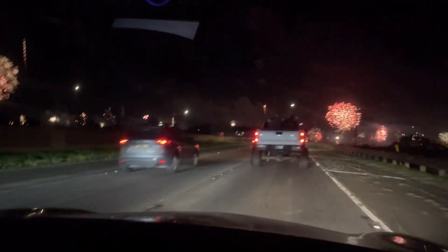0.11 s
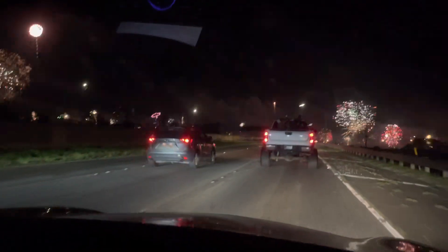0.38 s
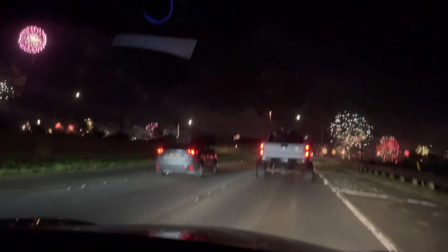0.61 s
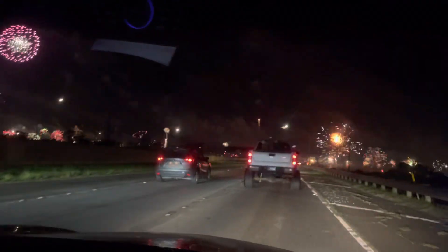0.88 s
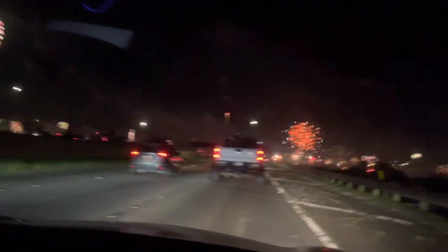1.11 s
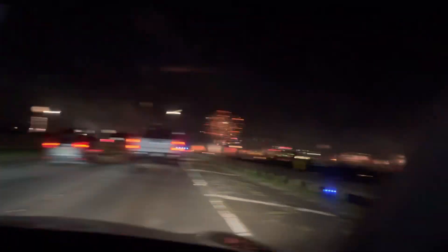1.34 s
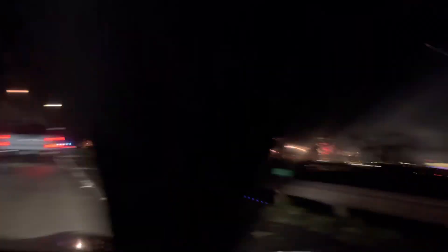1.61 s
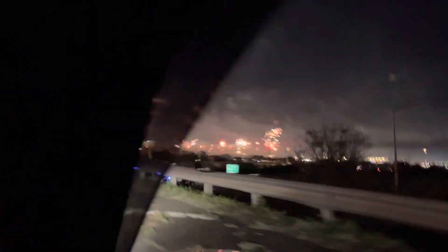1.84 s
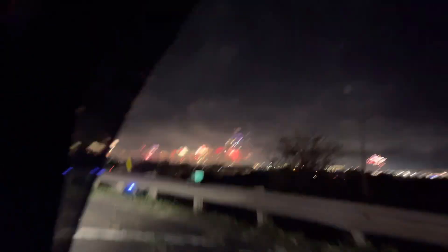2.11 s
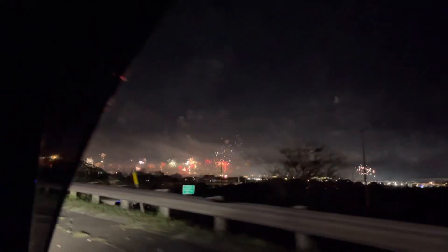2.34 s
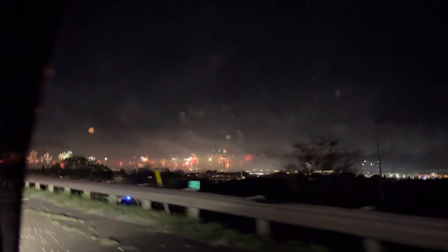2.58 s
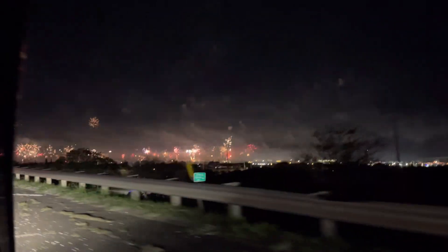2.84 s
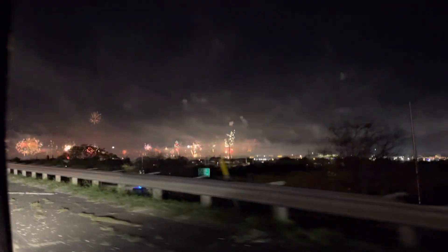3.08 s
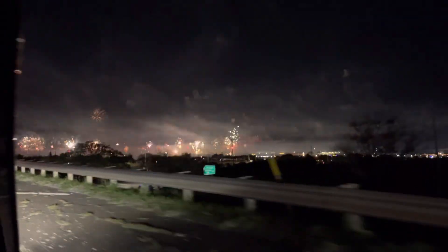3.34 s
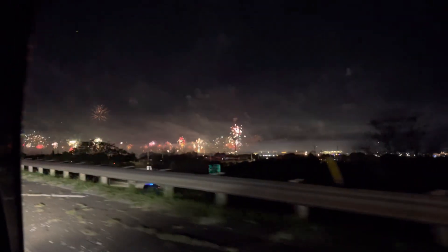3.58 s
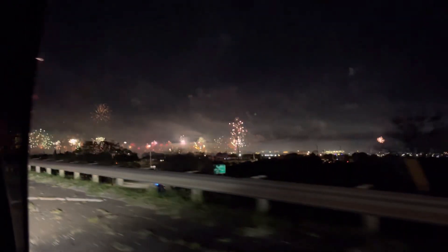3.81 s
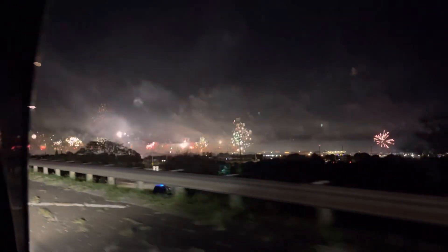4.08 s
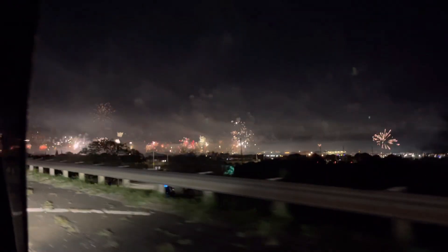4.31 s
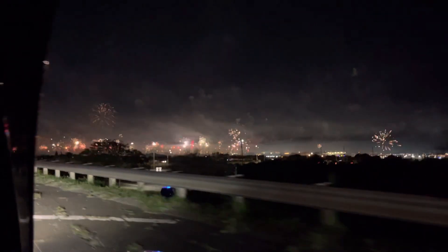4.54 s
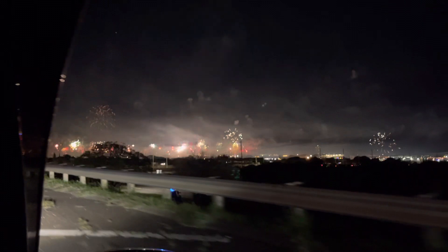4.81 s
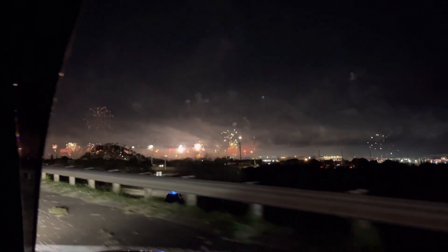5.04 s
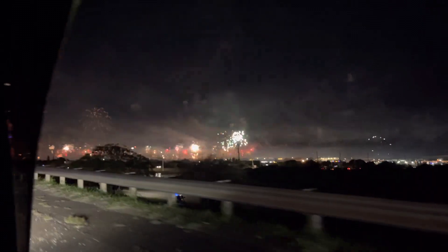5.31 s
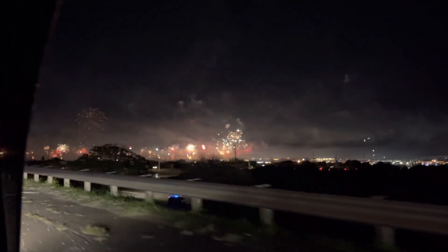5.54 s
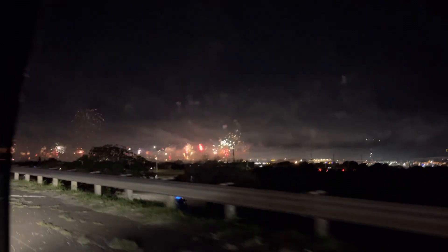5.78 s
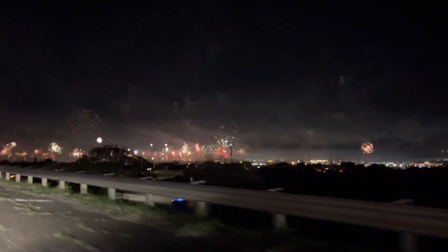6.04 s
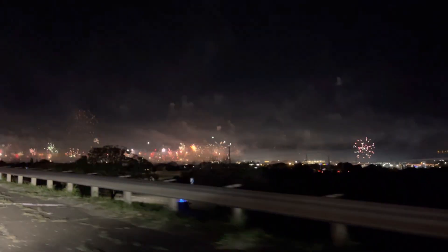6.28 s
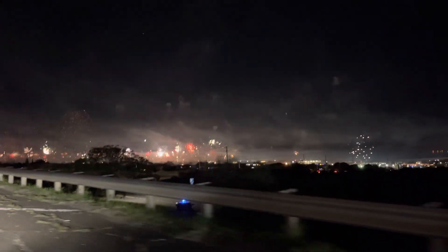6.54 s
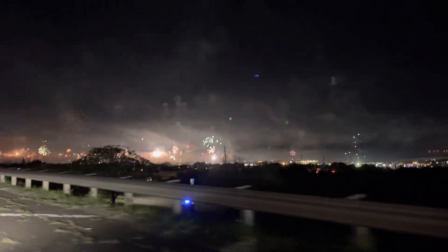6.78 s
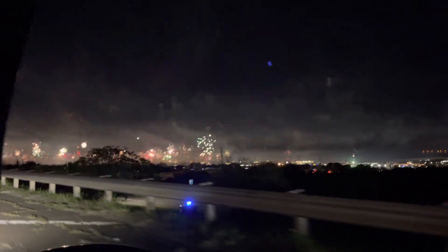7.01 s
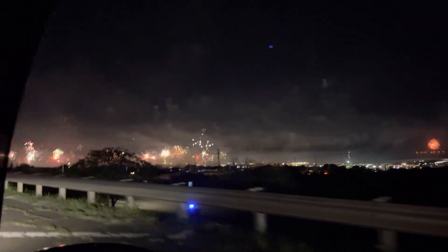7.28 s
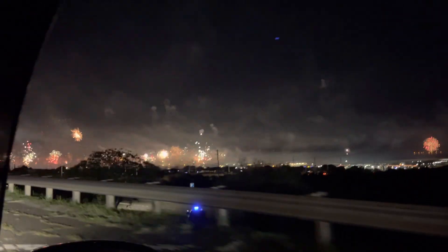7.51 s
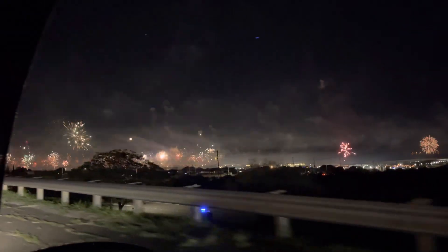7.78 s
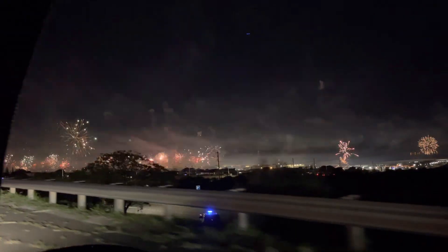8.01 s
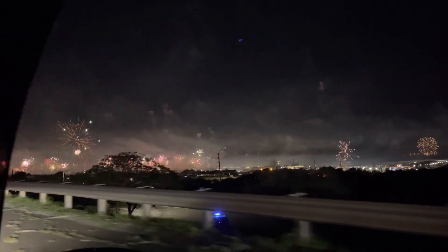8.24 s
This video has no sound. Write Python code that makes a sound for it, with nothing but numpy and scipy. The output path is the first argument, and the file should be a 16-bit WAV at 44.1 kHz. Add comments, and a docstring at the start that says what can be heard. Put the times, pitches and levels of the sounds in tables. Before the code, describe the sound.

Inside a moving car at night, low road boom gives way to dense, overlapping firework bangs and nonstop firecracker crackle from across a town.

```python
"""The low boom of a rolling car comes first; a moment later fireworks and firecrackers bang over a town at night.
A side window is open. Near bangs are blast pulses with echoes; far ones merge into a dull crackle.
Swarms of tiny pops make the sizzling stars; filtered noise makes the road, cabin boom, air rush and hiss.
The phone's crossover filters smear each pulse into a falling chirp, and a limiter holds the peaks."""
import sys
import numpy as np
from scipy import signal
from scipy.io import wavfile
from scipy.ndimage import uniform_filter1d, minimum_filter1d

SR = 44100
rng = np.random.default_rng(int(sys.argv[2]) if len(sys.argv) > 2 else 0)


def ratio_of_db(decibels):
    """Turn decibels (scalar or array-like) into linear amplitude factors; 0 dB maps to 1."""
    return 10 ** (np.asarray(decibels, float) / 20)


def dump(signal):
    """Clip the signal to [-1, 1] and save it as 16-bit WAV at the path in sys.argv[1]."""
    limited = np.clip(np.atleast_2d(signal).T, -1, 1)
    pcm = np.round(limited * 32767).astype(np.int16)
    wavfile.write(sys.argv[1], SR, pcm)


N = 369558


def rms_one(x):
    """Scale to unit rms."""
    return x / np.sqrt(np.mean(x ** 2) + 1e-20)


def in_time(rows):
    """Draw straight lines between the rows of a time table: one curve per column."""
    s, *columns = np.transpose(rows)
    return [np.interp(np.arange(N) / SR, s, column) for column in columns]


def at_hz(points, hz):
    """Read a spectrum at one frequency, on a log axis."""
    point_hz, value = np.array(points).T
    return np.interp(np.log(hz), np.log(point_hz), value)


def cut(x, hz, kind, order=2):
    """Butterworth filter: keeps the low, the high or a band of frequencies."""
    return signal.sosfilt(signal.butter(order, hz, kind, fs=SR, output="sos"), x)


def resonance(x, hz, width_hz):
    """A two-pole ringing band with gain 1 at its peak."""
    r = np.exp(-np.pi * width_hz / SR)
    poles = [1, -2 * r * np.cos(2 * np.pi * hz / SR), r * r]
    return signal.lfilter([(1 - r * r) / 2, 0, (r * r - 1) / 2], poles, x)


def drift(rate_hz):
    """Slow random wandering with spread 1, from smoothed noise."""
    step = 40   # samples between the points of the slow curve
    r = np.exp(-2 * np.pi * step * rate_hz / SR)
    noise = rng.standard_normal(N // step + 2002)
    slow = signal.lfilter([1], [1, -2 * r, r * r], noise)[2000:]   # skip the run-in
    return np.interp(np.arange(N) / step, np.arange(len(slow)), rms_one(slow))


def blast(push_ms, rise_ms):
    """A jump in pressure that falls through zero into suction; distance rounds the front."""
    age = np.arange(2000) / SR / (max(push_ms, .05) / 1000)
    r = np.exp(-1000 / SR / max(rise_ms, .01))
    pulse = signal.lfilter([1], np.poly([r, r, r]), (1 - age) * np.exp(-age))
    return pulse / pulse.max()


def at_ports(x, pan_db, lag_ms):
    """The middle range is shadowed on the far side, and the right port hears the whole pulse a little late."""
    middle = cut(x, [560, 4300], "band")
    left, right = x - middle + middle * ratio_of_db([[pan_db / 2], [-pan_db / 2]])
    n = np.arange(len(x))
    late_right = np.interp(n - lag_ms * SR / 1000, n, right, left=0)
    return np.array([left, late_right])


BOUNCE_MS, BOUNCE_SHARE = 1.2, 0.56   # longest delay and greatest strength of the bounces off road and barrier


def with_echoes(pulse, near_db, far_db, far_t60):
    """Two hard bounces colour a pulse; a tight cluster off ground and car body and a scattered tail follow."""
    age = np.arange(6000) / SR
    sparse = rng.random((3, len(age))) < .06
    # first the random draws, then thinned to single returns
    shared, left, right = rng.standard_normal((3, len(age))) * sparse
    decay = ratio_of_db(near_db - 60 * age / 0.016) + ratio_of_db(far_db - 60 * age / far_t60)
    returns = shared + 0.69 * np.array([left, right])
    path = cut(returns * decay, 3100, "low", order=1)
    path[:, 0] += 1   # the direct sound
    delays = 1 + (rng.random(2) * BOUNCE_MS * SR / 1000).astype(int)
    path[:, delays] += BOUNCE_SHARE * rng.random() * np.array([1, -1])
    return signal.fftconvolve(pulse, path, axes=1)[:, :len(age)]


BANG_LEFT_DB, BANG_SCATTER_DB = 7, 0.5   # bangs lie mostly to the left, scattered about that side
THUMP_PUSH_MS, THUMP_RISE_MS = 0.59, 0.35
# near bangs: (t/s, level/dB, push/ms grows with charge size, rise/ms grows with distance)
NEAR_BANGS = [(0.102, -7, 12, 0.033), (0.155, -5, 13, 0.3), (.534, -8, 1.1, 0.79), (0.558, -4, 1.4, 0.13),
              (0.6868, -1, 1.3, 0.082), (0.8172, -8.5, 0.71, 0.06), (1.064, -7.5, 0.3, 0.072),
              (1.066, -2, 3.5, 0.4), (1.141, -4.5, 1.2, 0.32), (1.323, 0.5, 4.4, 0.022),
              (1.4566, -3.5, 0.99, 0.43), (1.574, -2, 5, 0.051), (1.584, 2, 1.3, 0.6),
              (1.612, -4, 0.19, 0.082), (1.6757, -1, 0.66, 0.42), (1.7551, -5.5, 0.21, 0.036),
              (1.899, -5, 0.16, 0.088), (1.9789, 0.5, 2.3, 0.053), (1.996, 0, 0.12, 0.76),
              (2.037, -1, 0.68, 0.078), (2.304, -8, 0.46, 0.37), (2.322, 3.5, 2, 0.052),
              (2.377, 7, 1.05, 0.14), (2.464, -4.5, 0.91, 0.11), (2.502, -3, 3.9, 0.071),
              (2.531, -4, 0.17, 0.18), (2.7604, -1.5, 0.87, 0.058), (2.8043, 3, 0.38, 0.031),
              (2.8895, -9.5, 0.24, 0.051), (2.9141, -8.5, 0.29, 0.039), (3.039, 2, 2.5, 0.05),
              (3.101, 0, 1.6, 0.26), (3.181, -0.5, 0.9, 0.13), (3.24, -8, 0.56, 0.064),
              (3.426, -0.5, 0.52, 0.38), (3.448, -2, 0.48, 0.14), (3.61, 2.5, 2.1, 0.023),
              (3.7022, -1, 0.7, 0.044), (3.7806, -1.5, 0.88, 0.077), (3.857, -11.5, 0.26, 0.024),
              (3.8621, -1.5, 2.6, 0.062), (3.9379, -1, 1.7, 0.19), (4.1006, 0.5, 0.94, 0.065),
              (4.1198, 2, 2.5, 0.095), (4.2051, -1.5, 0.97, 0.058), (4.525, 4, 0.63, 0.029),
              (4.5951, 1.5, 2.9, 0.066), (4.626, -4, 0.34, 0.23), (4.644, -2.5, 0.82, 0.034),
              (4.6702, -3, 2.2, 0.15), (4.8898, -3, 0.26, 0.12), (4.9841, -3.5, 0.47, 0.11),
              (5.0872, -3, 0.52, 0.068), (5.1874, 1, 1.1, 0.07), (5.2, 1, 4.3, 0.42),
              (5.2376, -6, 0.58, 0.19), (5.332, -3.5, 0.72, 0.24), (5.4454, -7, 1, 0.034),
              (5.453, -2.5, 0.55, 0.76), (5.673, -1.5, 0.97, 0.092), (5.7047, 1, 4.3, 0.15),
              (5.73, -0.5, 1.2, 0.032), (5.818, 6, 1.36, 0.051), (5.879, 2, 0.57, 0.0097),
              (5.8979, 1.5, 1.4, 0.17), (5.9266, -1.5, 0.23, 0.029), (5.9709, 7, 0.45, 0.13),
              (6.079, -1, 1.1, 0.32), (6.0898, 12, 0.91, 0.028), (6.119, 2, 0.25, 0.034),
              (6.2061, 3.5, 0.8, 0.15), (6.3024, -3, 0.67, 0.073), (6.322, -3, 1, 0.48),
              (6.332, -4.5, 0.73, 0.1), (6.4701, -5, 0.94, 0.074), (6.504, 8, 0.64, 0.064),
              (6.708, 4, 0.21, 0.035), (6.7485, -7.5, 0.72, 0.032), (6.7637, -2.5, 0.85, 0.11),
              (7.049, -1, 1.1, 0.1), (7.115, 0, 1.3, 0.12), (7.2082, -2, 0.087, 0.07),
              (7.2698, -4.5, 0.42, 0.22), (7.3278, 0, 0.57, 0.056), (7.6012, 6.5, 1.8, 0.099),
              (7.629, -3.5, 0.8, 0.037), (7.752, 0, 0.85, 0.48), (7.841, -1.5, 0.8, 0.32),
              (8, -4, 0.69, 0.093), (8.308, -5, 0.56, 0.041)]
# far shells, heard as dull thumps of one size: (t/s, level/dB)
FAR_THUMPS = [(1.197, -8.5), (1.311, -2.5), (1.9641, -2), (2.225, -8), (2.025, -2), (2.056, 2),
              (2.095, -6.5), (2.208, -11), (2.2552, -13), (2.6335, -7), (2.829, -14), (3.021, -3),
              (3.075, -5.5), (3.677, -9), (3.747, -3.5), (3.893, -1), (4.282, -6), (4.33, -11), (6.525, -4),
              (6.567, -6), (6.631, -17), (6.695, -2), (6.827, -3.5), (6.906, -13), (7.298, -9),
              (7.581, -10.5), (7.885, -11), (7.967, -4.5)]


def near_bangs():
    """Each bang or thump is one blast pulse; the more it lies to the left, the later the right port hears it."""
    out = np.zeros((2, N + 6000))
    rows = NEAR_BANGS + [(s, db, THUMP_PUSH_MS, THUMP_RISE_MS) for s, db in FAR_THUMPS]
    sides_db = BANG_LEFT_DB + BANG_SCATTER_DB * rng.standard_normal(len(rows))
    for (s, level_db, push_ms, rise_ms), pan_db in zip(rows, sides_db):
        pulse = at_ports(blast(push_ms, rise_ms), pan_db, lag_ms=.012 * pan_db)
        heard = with_echoes(pulse, near_db=-15.5, far_db=-20.0, far_t60=0.079)
        at = round(s * SR)
        out[:, at:at + heard.shape[1]] += ratio_of_db(level_db) * heard
    return out[:, :N]


CRACKER_PUSH_MS, CRACKER_RISE_MS = 0.14, 0.065
# near firecrackers: (t/s, level/dB at 1.5-5 kHz)
NEAR_CRACKERS = [(2.6797, -24), (2.7365, -23), (2.917, -22), (3.069, -20), (3.2078, -18.5), (3.266, -31),
                 (3.325, -21.5), (3.66, -23), (3.913, -22), (4.021, -20.5), (4.1383, -18), (4.4998, -18),
                 (4.7516, -21), (5.1056, -30), (5.3677, -15.5), (5.4717, -28), (5.4909, -12.5),
                 (5.641, -23), (5.7852, -16), (5.9595, -23), (6.1826, -21), (6.786, -16.5), (7.2422, -21),
                 (7.3759, -16), (7.7132, -18), (7.921, -19.5)]


def near_crackers():
    """Firecrackers of one size close by, each a short sharp blast with its own returns."""
    out = np.zeros((2, N + 6000))
    sides_db = BANG_LEFT_DB + BANG_SCATTER_DB * rng.standard_normal(len(NEAR_CRACKERS))
    shape = blast(CRACKER_PUSH_MS, CRACKER_RISE_MS)
    shape = shape / np.abs(cut(shape, [1500, 5000], "band")).max()
    for (s, level_db), pan_db in zip(NEAR_CRACKERS, sides_db):
        pulse = at_ports(shape, pan_db, lag_ms=0.006 * pan_db)
        heard = with_echoes(pulse, near_db=-23.5, far_db=-9.5, far_t60=0.075)
        at = round(s * SR)
        out[:, at:at + heard.shape[1]] += ratio_of_db(level_db) * heard
    return out[:, :N]


# microphone port resonances: (f/Hz, width/Hz, level/dB)
PORT_RINGS = [(8710, 2350, 0), (11200, 1100, 0)]


def ports(x):
    """The microphone ports ring at the top of the range."""
    return sum(ratio_of_db(db) * resonance(x + 1e-18, hz, width) for hz, width, db in PORT_RINGS)


SPRAY_T60_S, SNAP_RISE_S = 0.086, 0.00042
# bright snaps: (t/s, relative treble level/dB, relative middle level/dB on top of the treble's)
BRIGHT_SNAPS = [(0.7068, -41.5, 20), (1.054, -27, -15), (1.068, -31.5, 17), (1.082, -32.5, 12.5),
                (1.1392, -30, -16), (1.3, -33.5, -11), (1.312, -44, 24), (1.3203, -21, 2), (1.458, -33, 21),
                (1.575, -38, 18), (1.9, -37.5, 23), (2.037, -34, -20), (2.322, -44, 15), (2.376, -23, 19.5),
                (2.5292, -32.5, 16.5), (2.8034, -44, 4), (2.8455, -40.5, 21), (3.04, -30.5, 16.5),
                (3.24, -43, 26), (3.4485, -31, 22), (3.6081, -35, 8), (3.702, -32, -19),
                (3.7818, -26.5, 17), (4.101, -29, 19.5), (4.526, -33, 1), (4.592, -35, 21), (4.613, -36, 1),
                (4.89, -32, 17.5), (5.126, -37, 24.5), (5.189, -42, 22), (5.399, -40.5, 23),
                (5.487, -47, 13.5), (5.7291, -37, 21), (5.8177, -32, 6), (5.876, -35.5, -6),
                (5.9776, -31, 15), (6.079, -30.5, 21.5), (6.118, -39.5, -4), (6.523, -36.5, 21),
                (6.7496, -48, 29), (7.205, -42, 11), (7.6012, -18.5, 15.5), (7.6134, -24.5, -20),
                (7.7512, -36.5, 18.5), (7.9658, -38, 19.5)]


def snaps():
    """A click and a short spray of noise, in the middle range and in the port resonances."""
    treble, middle = np.zeros((2, 2, N + 6000))
    age = np.arange(6000) / SR
    click = ratio_of_db(-60 * age / 0.0057)
    spray = ratio_of_db(-15.0 - 60 * age / SPRAY_T60_S)
    envelope = (click + spray) * np.minimum(age / SNAP_RISE_S, 1)
    noise = rng.standard_normal((len(BRIGHT_SNAPS), 2, 6000))
    for (s, treble_db, middle_db), (shared, own) in zip(BRIGHT_SNAPS, noise):
        stereo = shared + 0.071 * own * [[1], [-1]]
        burst = ratio_of_db(treble_db + 13.5) * envelope * stereo
        at = round(s * SR)
        treble[:, at:at + len(age)] += burst
        middle[:, at:at + len(age)] += ratio_of_db(middle_db - 12.5) * burst
    return ports(treble[:, :N]) + cut(middle[:, :N] + 1e-18, [1500, 5500], "band")


STAR_POPS_PER_S, STAR_LOW_HZ, STAR_HIGH_HZ = 640, 2600, 5560
# crackling stars burning out: (start t/s, length/s, level/dB)
STAR_SWARMS = [(1.89, 0.24, -47), (5.03, 0.3, -43.5), (7.273, 0.18, -51)]


def stars():
    """Swarms of tiny pops that swell and fade, alike at both ports."""
    t = np.arange(N) / SR
    swell = sum(ratio_of_db(db) * np.sin(np.pi * np.clip((t - s) / length, 0, 1)) for s, length, db in STAR_SWARMS)
    sizes = ratio_of_db(5.2 * np.minimum(rng.exponential(1, N), 4.0)) * rng.choice([-1, 1], N)
    pops = sizes * (rng.random(N) < STAR_POPS_PER_S / SR)
    return swell * rms_one(cut(pops + 1e-18, [STAR_LOW_HZ, STAR_HIGH_HZ], "band"))


def crackle(per_s, push_ms, rise_ms, spread_db, echo_db, count=7):
    """Random blasts from many directions and distances, coming in clumps; some arrive inverted off walls."""
    signs = np.where(rng.random(N) < .7, 1, -1)
    sizes = ratio_of_db(spread_db * np.minimum(rng.exponential(1, N), 3.0)) * signs
    born = rng.random(N) < per_s * ratio_of_db(2.5 * drift(5.0)) / SR
    dealt = rng.integers(0, count, N)   # which of the places each blast comes from
    places = rng.uniform(-1, 1, count)
    out = 0
    for k, scale in enumerate(np.geomspace(.55, 1.8, count)):
        shape = blast(push_ms * scale, rise_ms * scale)
        pulse = at_ports(shape, 5.0 + 3.0 * places[k], .04 + .09 * places[k])
        heard = with_echoes(pulse, near_db=echo_db + 3.0, far_db=echo_db, far_t60=0.16)
        out = out + signal.oaconvolve([sizes * born * (dealt == k)], heard, axes=1)[:, :N]
    return rms_one(out)


TURN_S, TURN_LENGTH_S = 1.51, 0.027   # the phone swings from the windscreen to the open window


def facing_in(turn_s, length_s):
    """1 while the phone points into the cabin, 0 once it looks out of the window."""
    return .5 - .5 * np.tanh((np.arange(N) / SR - turn_s) / max(length_s, .01))


CRACKERS_DB = -10   # small crackers relative to big shells
CRACKERS_SHADE_DB = -4   # the cabin shades the small crackers until the turn


def far_barrage(shells_db):
    """Far big shells and small crackers, two dense crackles that follow one level curve."""
    crackers_db = shells_db + CRACKERS_DB + CRACKERS_SHADE_DB * facing_in(TURN_S, TURN_LENGTH_S)
    shells = crackle(130, push_ms=0.73, rise_ms=0.38, spread_db=2.5, echo_db=-19.5)
    crackers = crackle(380, push_ms=0.12, rise_ms=0.092, spread_db=3.0, echo_db=-4.5)
    return ratio_of_db(shells_db) * shells + ratio_of_db(crackers_db) * crackers


# hollow rings of the cabin: (f/Hz, width/Hz, level/dB)
CABIN_RINGS = [(278.5, 140, -4.5), (910, 79, -9.5), (4300, 730, -6.5)]


def cabin_knock(blasts):
    """The blasts set off hollow rings in the cabin."""
    return sum(ratio_of_db(db) * resonance(blasts, hz, width) for hz, width, db in CABIN_RINGS)


WINDOW_S = 2.4   # the phone clears the door pillar
# colour off the windscreen glass: (f/Hz, width/Hz, level/dB)
WINDSCREEN_COLOUR = [(321, 23, 3.5), (480, 73, 2), (634, 240, -5), (1230, 100, 1.5), (2100, 790, -2)]
# colour between the turn and clearing the pillar: (f/Hz, width/Hz, level/dB)
PILLAR_COLOUR = [(696, 150, -5), (1077, 83, 6), (2260, 1000, 3)]


def cabin_colour(x):
    """Reflections off the glass near the phone hollow one band and lift the next, by where it points."""
    ahead = facing_in(TURN_S, TURN_LENGTH_S)
    short_of_window = facing_in(WINDOW_S, TURN_LENGTH_S)
    for share, bands in [(ahead, WINDSCREEN_COLOUR), (short_of_window - ahead, PILLAR_COLOUR)]:
        for hz, width, db in bands:
            x = x + share * (ratio_of_db(db) - 1) * resonance(x, hz, width)
    return x


# how alike left and right are: (f/Hz, likeness, 1 = the same)
LEFT_RIGHT_LIKENESS = [(60, 0.99), (280, 0.83), (590, 0.054), (1300, 0.072), (2700, 0.29), (5900, 1)]


def banded_noise(spectrum, patchy_db):
    """Narrow bands of stereo noise with their own level, flicker and likeness; rms 1."""
    out, together = 0, drift(4.0)
    edges = 28 * 2 ** np.arange(0, 9, .4)
    white = rng.standard_normal((2, 2, N + SR // 4))   # with a run-in; neighbouring bands take turns
    for k, (low, high) in enumerate(zip(edges, edges[1:])):
        hz = np.sqrt(low * high)
        if not spectrum[0][0] < hz < spectrum[-1][0]:
            continue
        mid, side = cut(white[k % 2], [low, high], "band")[:, -N:]
        alike = np.clip(at_hz(LEFT_RIGHT_LIKENESS, hz), -1, 1)
        gain = ratio_of_db(at_hz(spectrum, hz) + patchy_db * (together + drift(11.0)))
        out = out + gain * (np.sqrt(1 + alike) * mid + np.sqrt(1 - alike) * side * [[1], [-1]])
    return rms_one(out)


GRAIN_PER_S, GRAIN_DB, GRAIN_S = 250, -6.5, 0.003   # the farthest crackers, melted into the rush


def grain():
    """Gain that jumps with every tiny far pop and dies at once; rms 1."""
    pops = rng.exponential(1, N) * (rng.random(N) < GRAIN_PER_S / SR)
    return rms_one(1 + ratio_of_db(GRAIN_DB) * signal.lfilter([1], [1, -np.exp(-1 / (GRAIN_S * SR))], pops))


# spectrum of tyre and air rush: (f/Hz, relative level/dB per Hz)
RUSH_SPECTRUM = [(720, 6), (1100, 12), (1500, 13), (2200, 8.5), (3300, -8), (4300, -3.5), (5600, -16),
                 (7500, -56)]


def air_rush(rush_db):
    """Tyre and air rush: grainy banded noise, a little louder on the left."""
    return ratio_of_db(rush_db + [[1.5], [-1.5]]) * grain() * banded_noise(RUSH_SPECTRUM, patchy_db=1.6)


ROAD_DB, ROAD_SWELL_DB = -26.5, 5
# spectrum of the road: (f/Hz, relative level/dB per Hz)
ROAD_SPECTRUM = [(30, -37), (45, 12.5), (90, -15.5), (180, 3.5), (330, -4.5), (520, -7.5), (800, -25)]


def road_rumble():
    """Low banded noise of the road, slowly swelling and sinking."""
    road_db = ROAD_DB + ROAD_SWELL_DB * drift(1.2)
    return ratio_of_db(road_db) * banded_noise(ROAD_SPECTRUM, patchy_db=.8)


# upper modes relative to the low mode, strong inside the cabin
UPPER_INSIDE_DB, UPPER_WINDOW_DB, UPPER_FADE_S = -0.5, -15, 2.2
# lowest mode of the cabin boom, driven by the road surface: (t/s, level/dB)
BOOM_LEVEL = [(0, -17), (.37, -24.5), (.91, -19), (2.85, -31), (3.17, -30), (4.43, -23), (5.4, -28),
              (7.09, -22.5), (7.86, -25.5), (8.38, -31)]
# air modes of the cabin: (f/Hz, width/Hz)
BOOM_RINGS = [(61, 12.7), (119, 25), (186, 8.3)]


def cabin_boom():
    """Tyre noise drives low air modes of the cabin; the two upper ones waver, and fade near the open window."""
    low_db, = in_time(BOOM_LEVEL)
    inside = facing_in(UPPER_FADE_S, 0.11)
    upper_db = low_db + UPPER_WINDOW_DB + (UPPER_INSIDE_DB - UPPER_WINDOW_DB) * inside + 2.3 * drift(2.5)
    boom = 0
    for db, (hz, width) in zip([low_db, upper_db, upper_db - 7.0], BOOM_RINGS):
        noise = rng.standard_normal(N + SR)   # one second of run-in
        ringing = resonance(resonance(noise, hz, width), hz, width)[SR:]
        boom = boom + ratio_of_db(db) * rms_one(ringing)
    return boom


HISS_DB = -58


def port_hiss():
    """Steady air hiss in the port resonances, nearly alike on both sides."""
    shared, own = rng.standard_normal((2, N))
    return ratio_of_db(HISS_DB) * rms_one(ports(ports(shared + 0.083 * own * [[1], [-1]])))


# outside the window: (t/s, far barrage level/dB of the big shells, tyre and air rush level/dB)
OUTSIDE_LEVELS = [(0, -27, -38.5), (.5, -22, -43), (1.42, -23, -35), (1.58, -20.5, -32), (2.0, -17.5, -38),
                  (2.33, -14.5, -30.5), (2.45, -21.5, -37.5), (3.6, -18.5, -33.5), (4.3, -19, -35),
                  (5.2, -18, -32.5), (5.55, -20.5, -33), (6.3, -20, -32.5), (7.0, -19, -35.5),
                  (7.35, -15, -38.5), (7.6, -21.5, -36), (8.38, -18, -48.5)]


def scene():
    """Bangs and crackle over road, boom, rush and hiss."""
    shells_db, rush_db = in_time(OUTSIDE_LEVELS)
    blasts = near_bangs() + near_crackers() + far_barrage(shells_db)
    in_cabin = cabin_colour(blasts + cabin_knock(blasts) + road_rumble() + air_rush(rush_db))
    return in_cabin + snaps() + stars() + port_hiss() + cabin_boom()


def all_pass(x, hz, q):
    """Second-order all-pass: flat level, delay around its frequency."""
    w = 2 * np.pi * hz / SR
    a = [1 + np.sin(w) / (2 * q), -2 * np.cos(w), 1 - np.sin(w) / (2 * q)]
    return signal.lfilter(a[::-1], a, x)


# all-pass stages of the phone's crossover: (f/Hz, Q)
CROSSOVER_STAGES = [(120, 0.11), (135, 1), (278, 1), (1194, 0.026)]


def crossover_smear(x):
    """The crossover delays low frequencies most, so each pulse becomes a falling chirp."""
    for hz, q in CROSSOVER_STAGES:
        x = all_pass(x, hz, q)
    return x


def limiter(x, top, release_db_per_s):
    """Gain dips just ahead of each peak over the top and recovers at a steady rate."""
    over = np.maximum(20 * np.log10(np.abs(x).max(axis=0) / top + 1e-9), 0)
    ramp = release_db_per_s * np.arange(N) / SR
    held = np.maximum.accumulate(over + ramp) - ramp
    return x * ratio_of_db(uniform_filter1d(minimum_filter1d(-held, size=64), size=64))


def band_limit(x):
    """A steep low-pass at the top of the band."""
    return signal.sosfilt(signal.butter(12, 13170, fs=SR, output="sos"), x)


def record(dry):
    """The phone: low cut, crossover smear, a phase turn high in the left port, limiter and high cut."""
    x = cut(dry * ratio_of_db([[-.2], [.2]]), 51.4, "high", order=4)
    x = crossover_smear(x)
    x[0] = all_pass(x[0], 10200, 4.0)
    x = limiter(x, top=.92, release_db_per_s=900)
    x = cut(x, 10630, "low", order=10)
    return band_limit(x)


dry = scene()
out = record(dry)
dump(out)
```